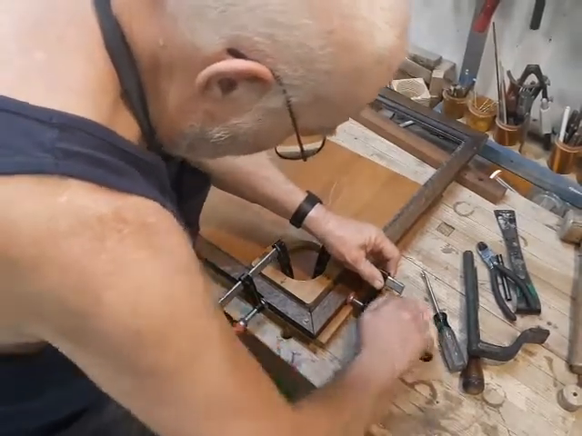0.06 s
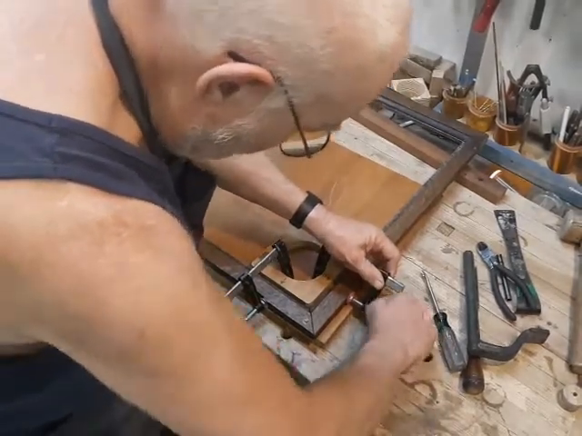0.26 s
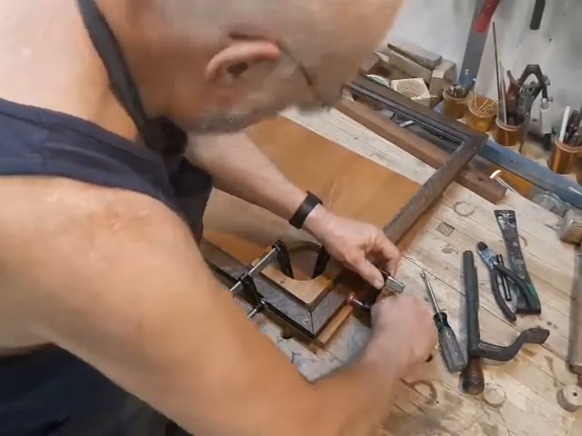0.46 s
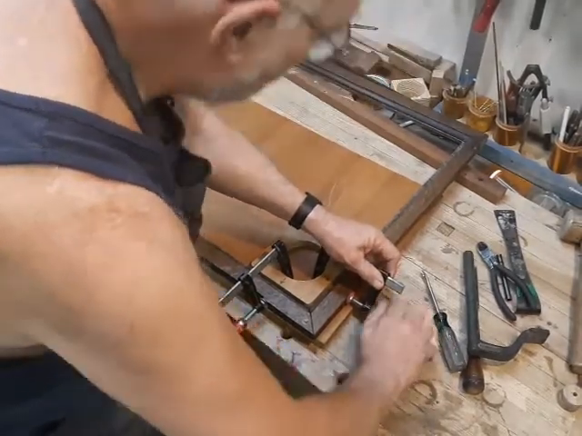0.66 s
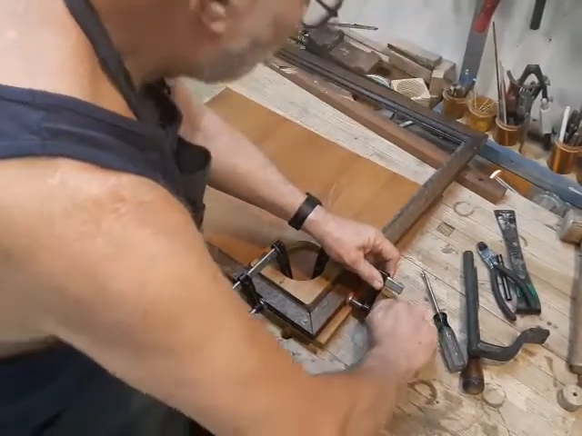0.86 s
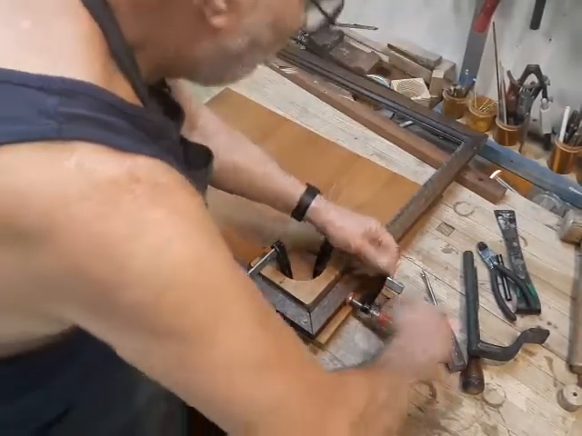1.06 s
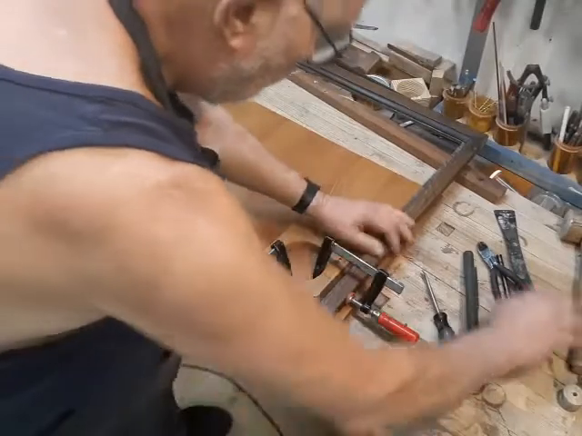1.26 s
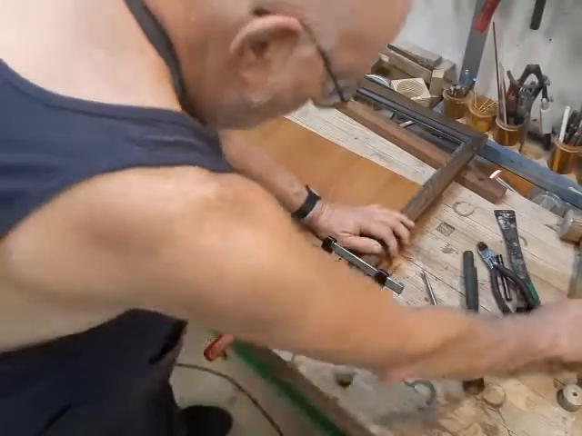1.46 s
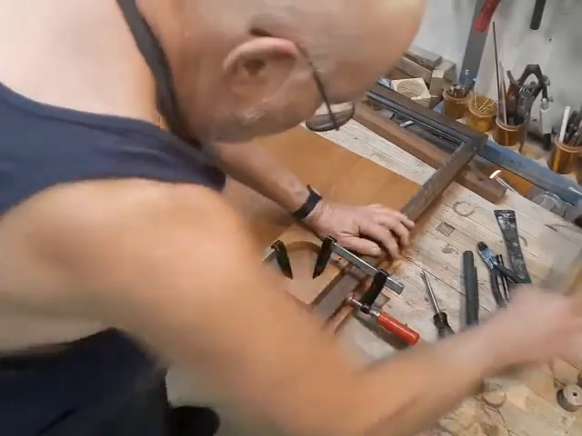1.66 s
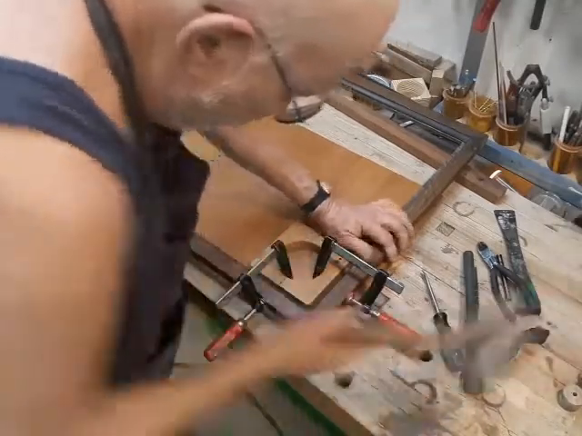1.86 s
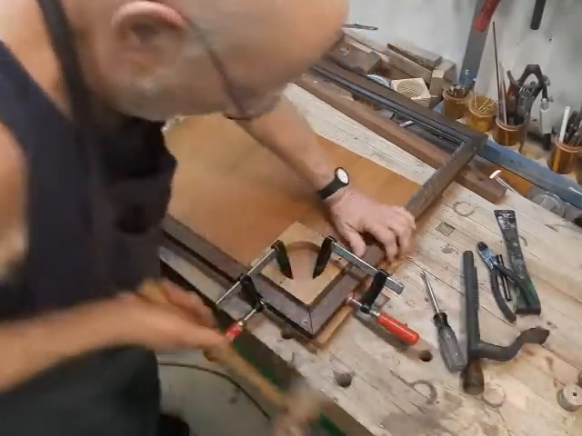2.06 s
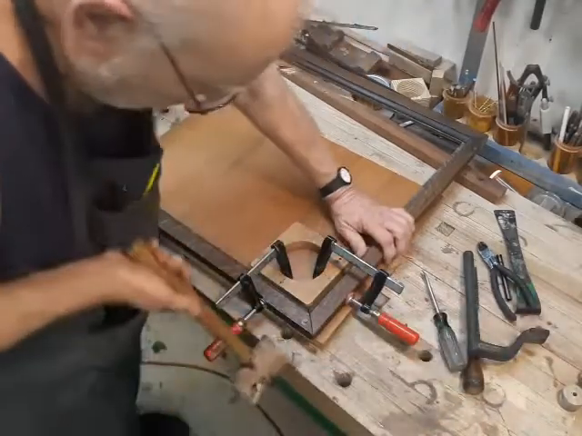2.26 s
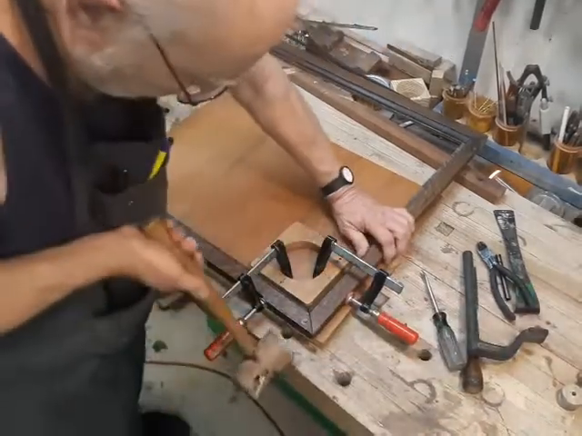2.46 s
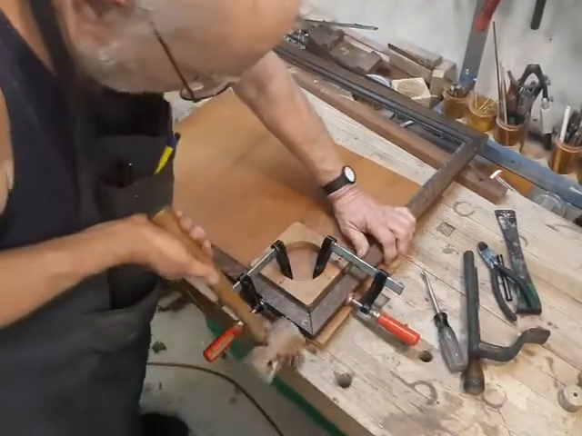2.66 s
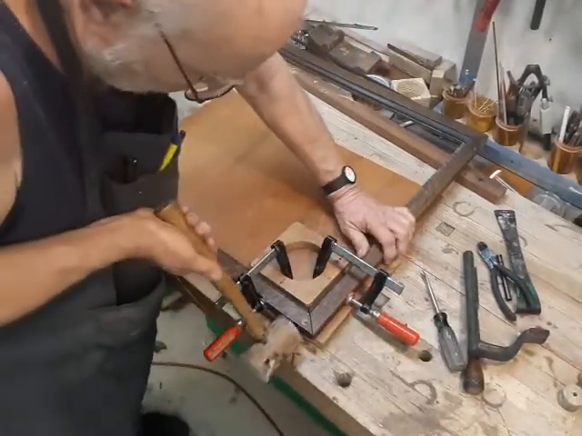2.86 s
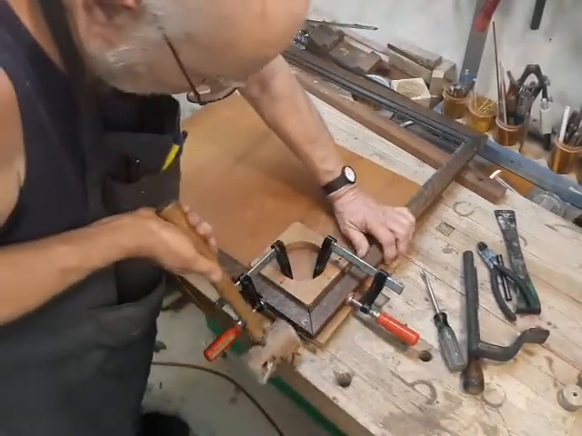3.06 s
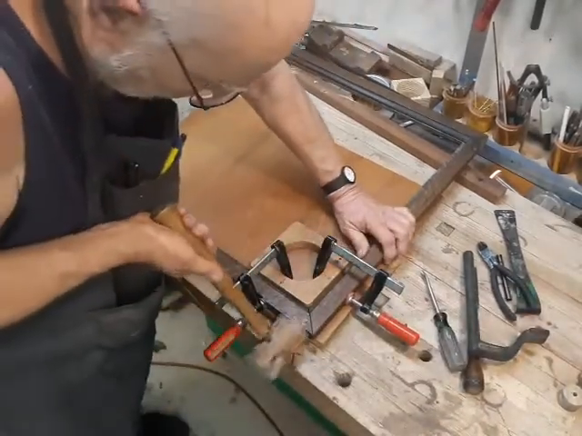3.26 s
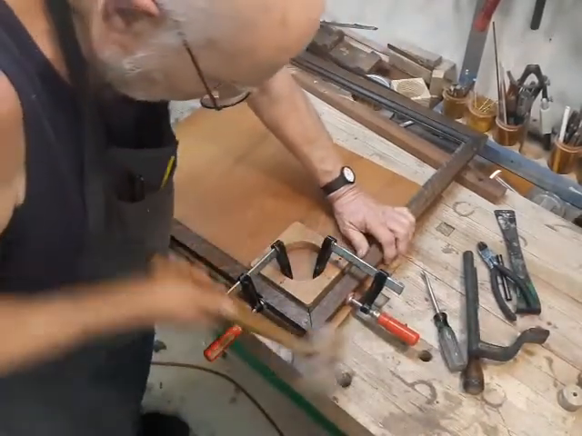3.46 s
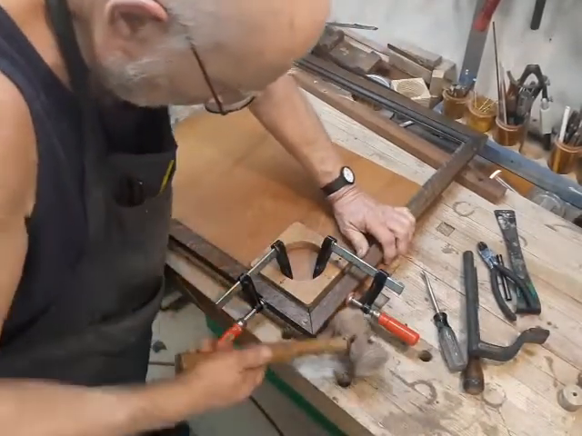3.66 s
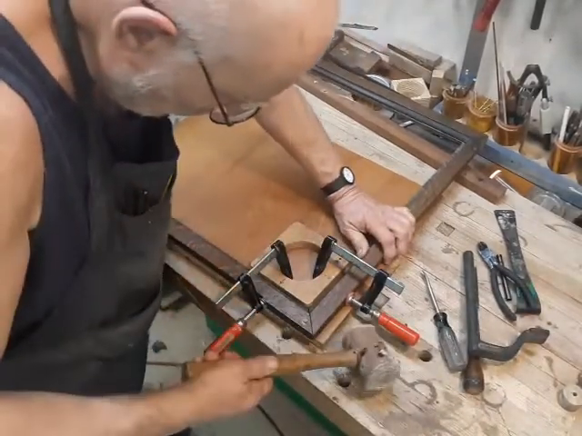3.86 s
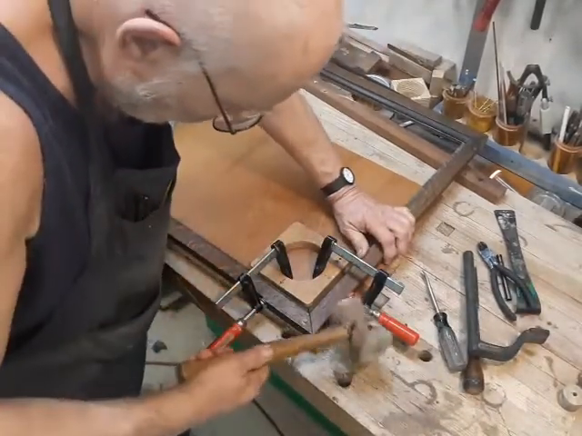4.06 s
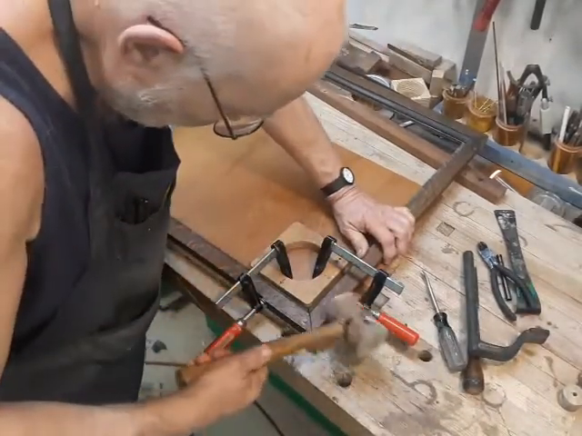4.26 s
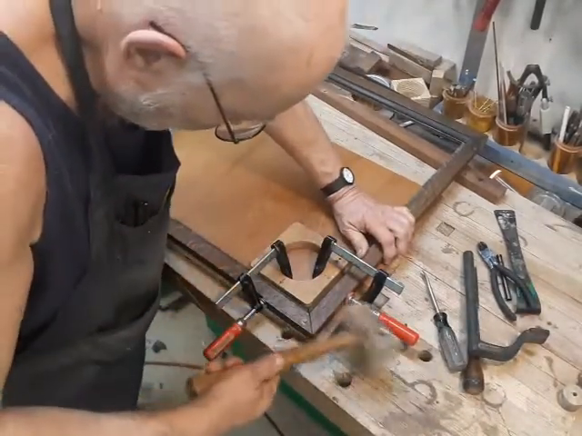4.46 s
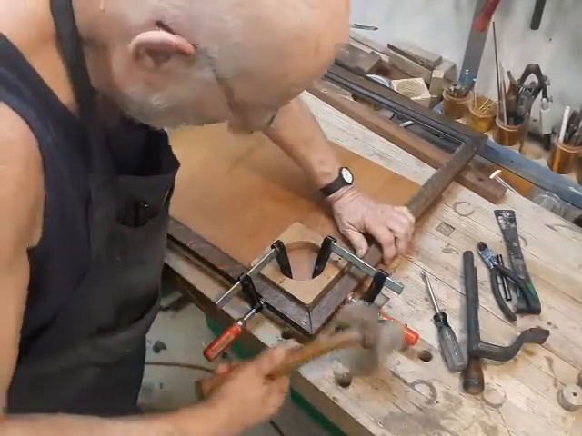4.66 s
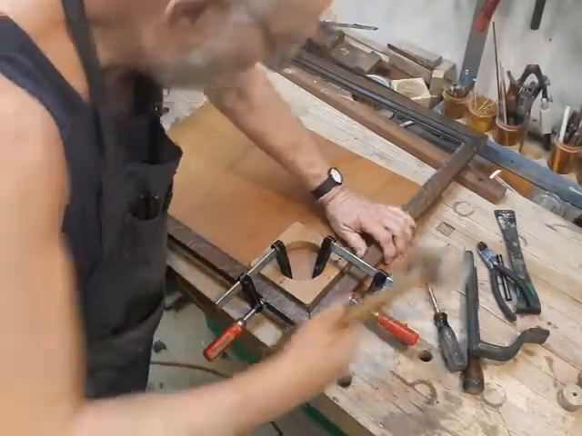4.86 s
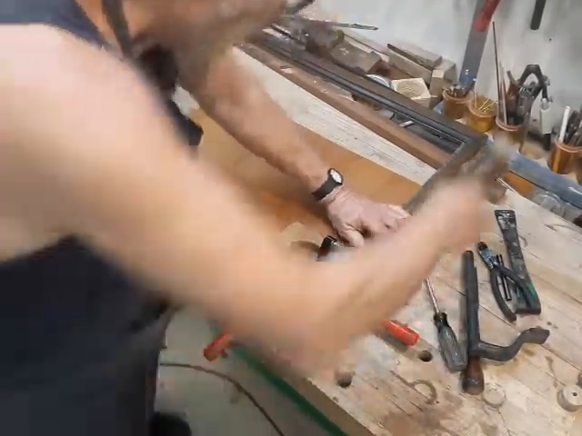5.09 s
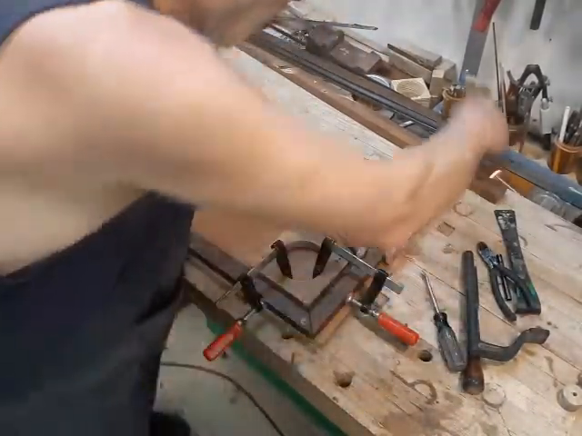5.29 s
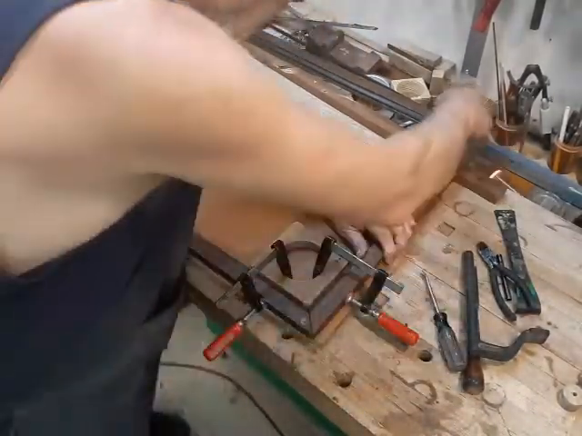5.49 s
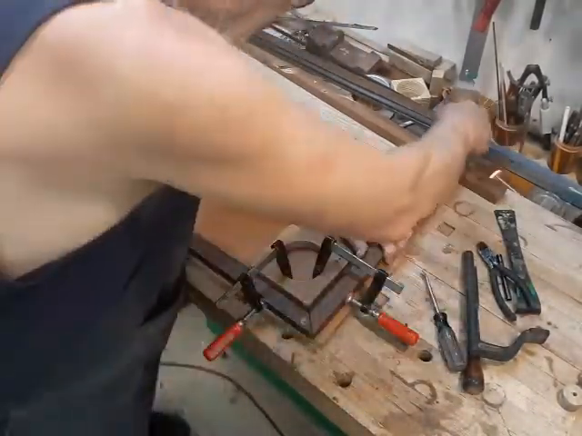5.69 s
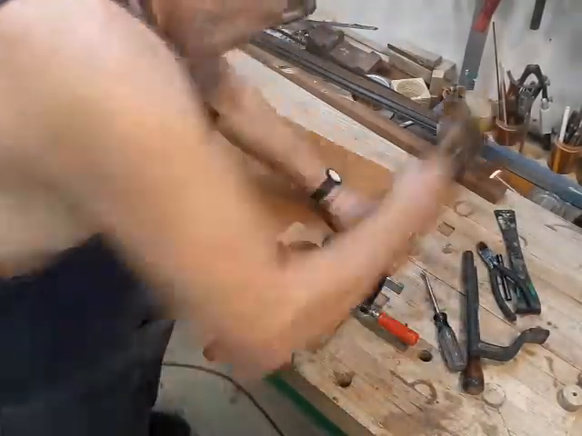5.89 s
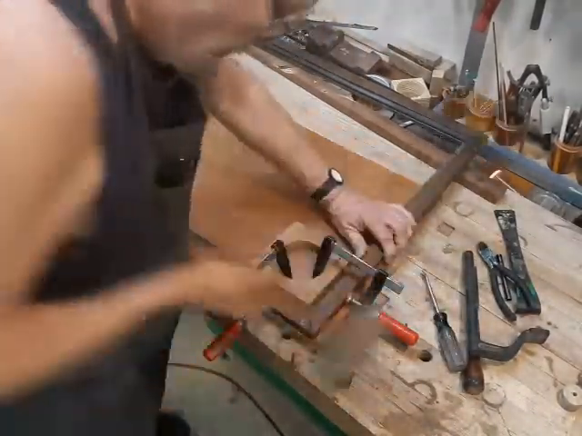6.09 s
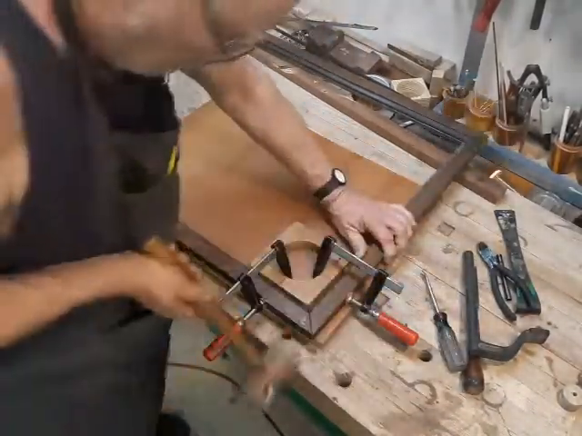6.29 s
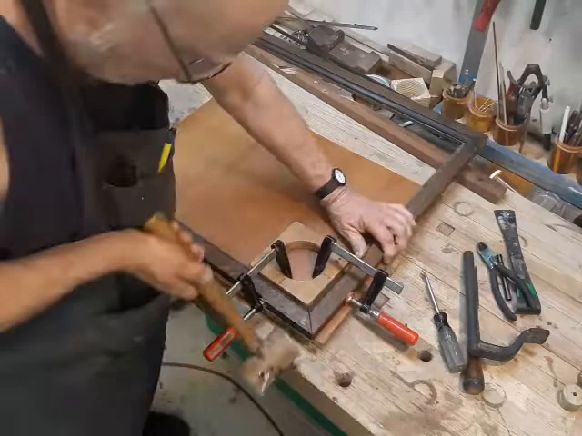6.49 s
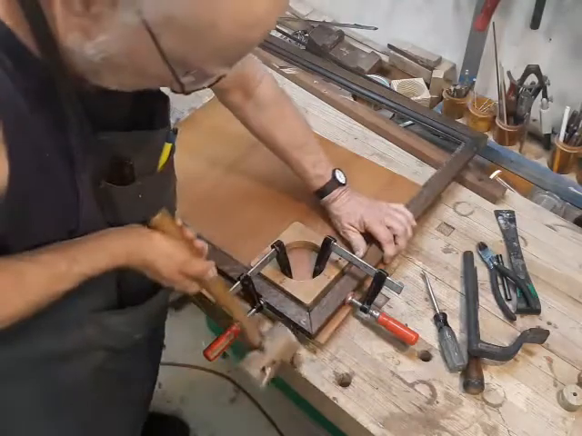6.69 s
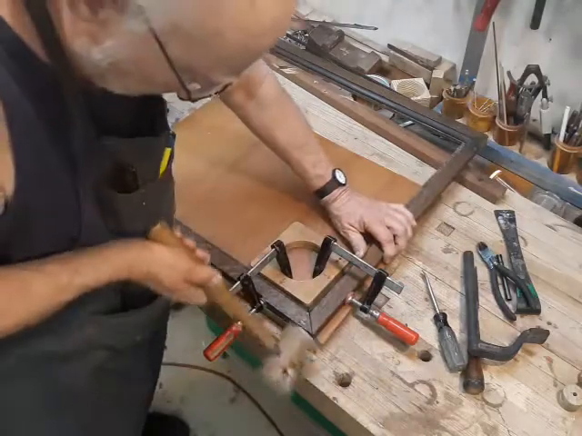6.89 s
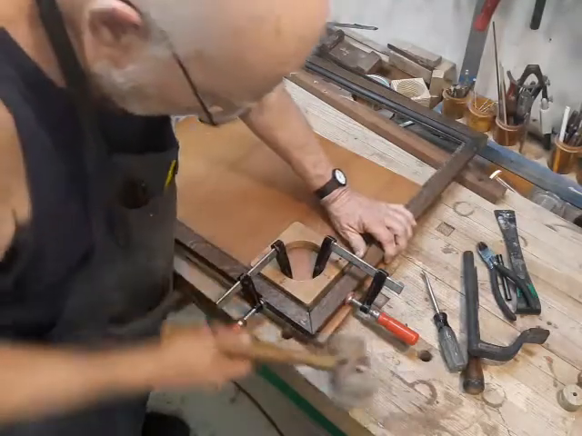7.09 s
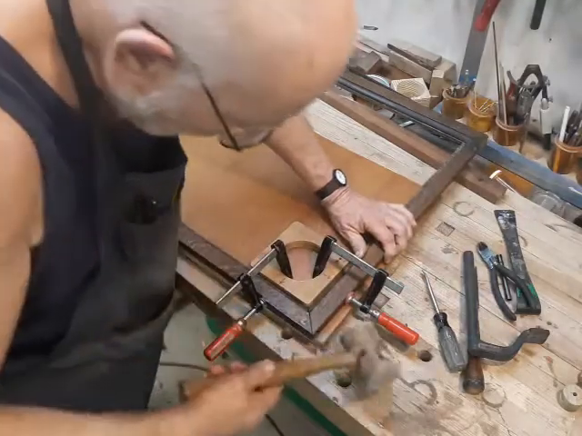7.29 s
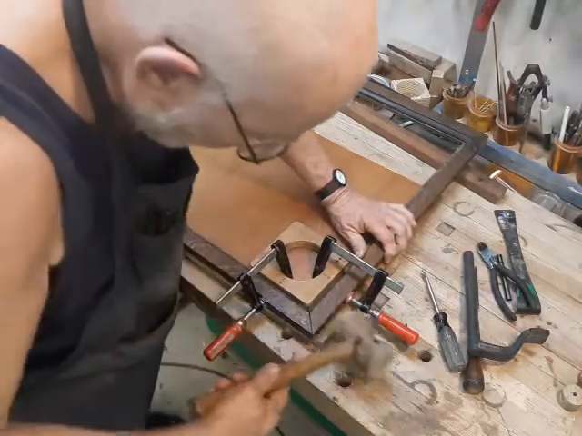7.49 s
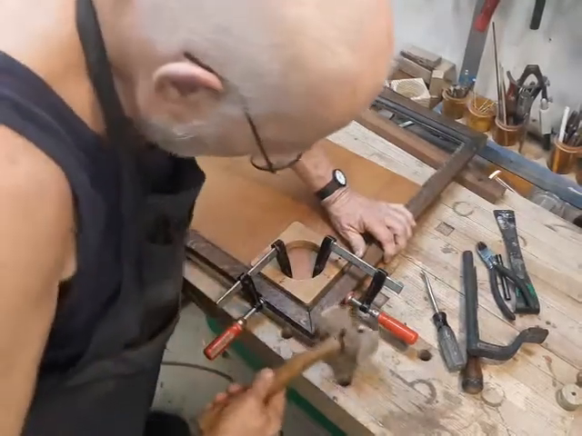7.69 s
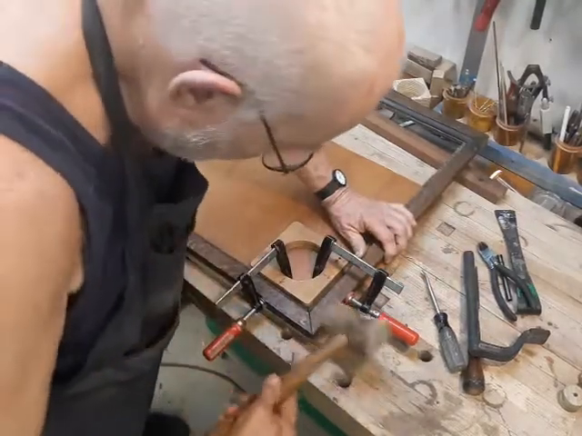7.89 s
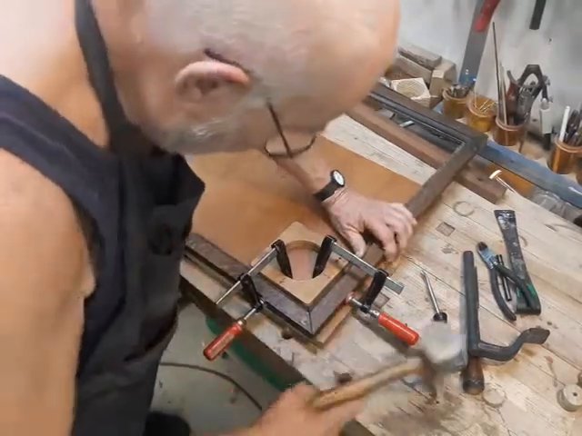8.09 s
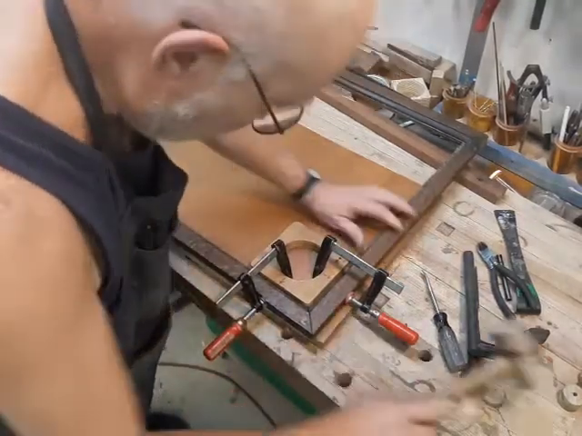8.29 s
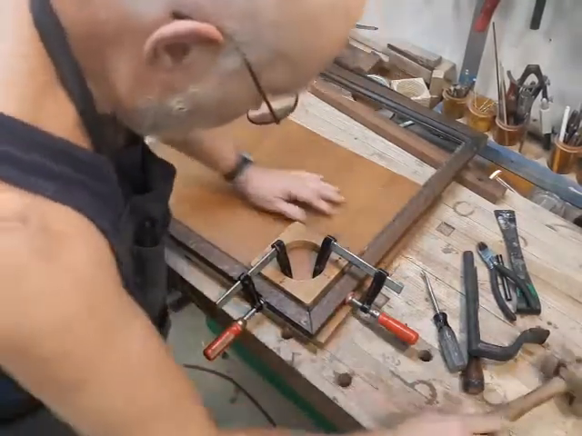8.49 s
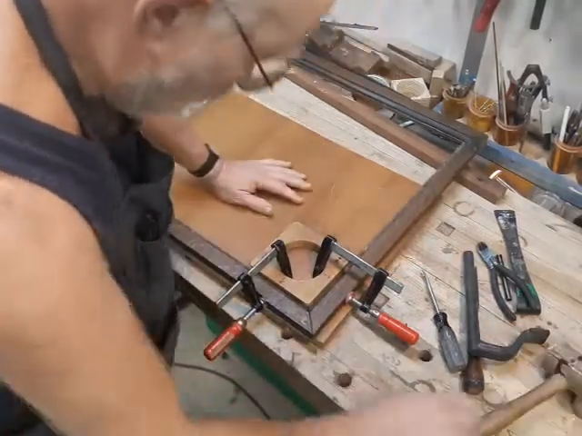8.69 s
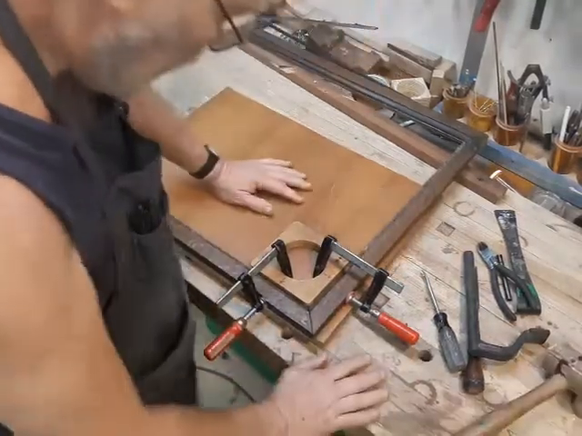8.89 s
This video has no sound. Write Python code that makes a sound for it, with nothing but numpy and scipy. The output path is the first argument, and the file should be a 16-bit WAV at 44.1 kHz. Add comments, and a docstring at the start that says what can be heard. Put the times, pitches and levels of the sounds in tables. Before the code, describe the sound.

A small workshop, captured close in stereo by a phone, near sounds leaning right over low rumble and very faint hiss. From 0.2 to 0.45 s clamp screws give tiny dry steel clicks, with soft rubbing; more clicks and a small knock come near 0.8-0.9 s. Rustling cloth and hand strokes run from 1 to 2.2 s, with a stronger brushing scrape at about 1.8. Hammer taps on the clamped wood begin at 2.8, growing to hard knocks at 3.1 and 3.3, then 4.0, 4.2 and 4.5. A slide follows at 4.8. Softer knocks fall at 5.5 and 5.7, the two loudest cracks at 6.55 and 6.75, then a faint one at 7.4 and firm taps at 7.6 and 7.8. Each has short woody ring, rattle and quick room decay. From 8.2 a loud, bright scraping slide leads to a bumping clatter at 8.4-8.7, then light rubbing.

```python
"""A workshop bench, heard from close by through the two microphone ports of a phone.
Clamp screws click and creak (short steel modes, noise ticks); hands and a hammer slide over the wood (bands of
uneven noise). Then the hammer taps the clamped frame in short series (decaying wood modes, rattle and crack);
the small room answers with fading noise over a low rumble and faint hiss."""
import sys
import numpy as np
from scipy import signal
from scipy.fft import rfft, irfft, next_fast_len
from scipy.io import wavfile
from scipy.ndimage import uniform_filter1d

SR = 44100
rng = np.random.default_rng(int(sys.argv[2]) if len(sys.argv) > 2 else 0)


def transcribe(signal):
    """Save signal, clipped to [-1, 1], as a 16-bit WAV file at the path in sys.argv[1]."""
    frames = np.atleast_2d(signal).T
    limited = np.clip(frames, -1, 1)
    pcm = np.round(limited * 32767).astype(np.int16)
    wavfile.write(sys.argv[1], SR, pcm)


def boost_factor(decibels):
    """Convert a level in decibels to a linear amplitude factor."""
    exponent = np.asarray(decibels, float) / 20
    return 10 ** exponent


N = 394242  # length in samples

# Modes of the frame and bench. Each row: pitch in Hz, level in dB, time to fall 60 dB in seconds.
WOOD_MODES = [(152.3, 1, 0.33), (232.4, -7.5, .15), (297.7, 0, 0.12), (371.6, 3.5, 0.19), (413, -2, 0.16),
              (526, 2, 0.15), (591, -1.5, .2), (652, 2, 0.095), (749.5, 2.5, .12), (872, -3, 0.067),
              (1049, 2, .09), (1186, -4, .08), (1322, -3, 0.096), (1432, -4.5, 0.058), (1785, -6.5, 0.041),
              (1980, -3.5, 0.065), (2297, 2, 0.028), (2440, -5, 0.017), (2983, 3.5, 0.023),
              (3170, 1.5, 0.0057), (6340, 0.5, 0.07)]


def taps(stock):
    """Each blow: a crack, the wood rings, loose clamps and tools rattle for some ms, the room answers."""
    # Each row: start in seconds, level in dB, then bench share, knock share and brightness in dB.
    blows = [(0.9099, -46.5, -24, -1, -6), (0.915, -31, -33.5, -13, -10.5), (2.2677, -58, 10.5, -6, -6),
             (2.814, -23.5, -20.5, 0, -6.5), (2.9762, -27, -16, 6, -8.5), (3.1156, -12, -27.5, -3.5, -12),
             (3.2679, -9.5, -30, -6, -11.5), (3.979, -26.5, -11, -8, -2.5),
             (4.2382, -16.5, -16.5, -13, -4.5), (4.502, -13, -18.5, -9, -0.1),
             (5.5104, -27.5, -19, 1.5, -2), (5.5174, -28.5, -18.5, -5.5, 4.5),
             (5.723, -37.5, -7.5, -2.5, 1.5), (6.558, -7, -34, -14.5, -2), (6.7543, -6.5, -36.5, -11.5, -9),
             (7.3864, -36, -5, -5, -5.5), (7.6005, -15.5, -21.5, -11.5, -3),
             (7.7888, -22.5, -21.5, -9, -13), (8.0317, -61.5, -10, -6, 2), (8.4379, -21, -27, -25.5, -5),
             (8.4434, -22, -29, -24, -5), (8.4594, -30.5, -11, -4.5, -7), (8.5008, -36.5, -5, 7, 1),
             (8.547, -40, 2.5, 6, -15), (8.5866, -25.5, -12, 2.5, 6.5), (8.6371, -33, -13, -7.5, -2),
             (8.7003, -60, -11.5, -5, 12.5)]
    near, far = np.zeros((2, 2, N))
    t = np.arange(SR // 4) / SR
    push = np.minimum(t / 0.0011, 1)  # onset in 1.1 ms
    # the wood is louder while the hammer's wave first runs through it
    first_wave = 1 + boost_factor(4) * np.exp(-t / 0.0061)
    room_db, drier_per_db = -1.5, 0.111  # room share of a full-scale blow; harder blows sound drier
    for s, db, bench_db, knock_db, treble_db in blows:
        thud_db = 0.73 * bench_db + 3.5  # the frame thuds along with the bench
        spot = [(150, bench_db), (330, thud_db), (700, knock_db), (1700, 0),
                (5000, treble_db), (11000, treble_db - 3.5)]
        wood = boost_factor(db - 13.5) * ring(WOOD_MODES, spot, scatter_db=2.5)

        shake, grit = (ports(size=len(t)) * push for _ in range(2))
        fade = fall(t, 0.065)
        rattle = peak(band(shake * fade, 880, 3100), db - 6)
        rattle += peak(band(grit * fade, 1900, 9700), db + treble_db - 3.5)
        crack = peak(band(shake * fall(t, 0.008), 2500, 11000), db + treble_db - 2.5)
        crack += peak(band(grit * fall(t, 0.024), 8400, 16500), db + treble_db - 4.5)
        add(near, s, push * first_wave * wood + rattle + crack)

        # narrow bass octaves need more level per hertz
        source = [(hz, share_db - 3.05 * np.log2(hz / 1700)) for hz, share_db in spot]
        add(far, s, boost_factor(db + room_db - drier_per_db * db) * echoes(source, stock))
    return near, through_wood(far, lift_db=-4.5, width_hz=18)


def ring(modes, source, scatter_db):
    """One blow's ringing at both ports; the spot struck, a (Hz, dB) spectrum, decides which modes wake."""
    hz, db, t60 = np.transpose(modes)
    t = np.arange(SR // 4) / SR
    detune, luck = rng.standard_normal((2, len(modes)))
    sign = (-1) ** np.arange(len(modes))  # neighbours start opposite
    size = boost_factor(db + on_log(source, hz) + scatter_db * luck) * sign
    pole = 2j * np.pi * hz * (1 + 0.005 * detune) - np.log(1000) / t60
    port_gap_s = 0.00008  # arrival time between the ports
    turn = np.exp(2j * np.pi * np.outer([0, port_gap_s], hz))
    return np.imag((size * turn) @ np.exp(np.outer(pole, t)))


def rubs():
    """Strokes of skin, cloth and tool: dense uneven grit; pressure moves the level, the surface the colour."""
    # Each row: time of full pressure in seconds, rise in seconds, hold in seconds,
    # hiss level in dB, coarseness in dB.
    strokes = [(0.001, .02, 0.036, -71, -18), (0.175, 0.086, 0.1, -69.5, 2), (0.373, .02, 0.051, -65.5, 7),
               (0.46, .02, 0.074, -69, -6), (0.598, .05, .02, -73, -10), (0.705, 0.082, .02, -63.5, -2.5),
               (0.767, 0.066, 0.11, -83, 10), (1.044, 0.26, 0.041, -63.5, -7.5),
               (1.129, 0.038, 0.015, -59, -16), (1.237, .01, .012, -64, -15),
               (1.274, 0.038, 0.024, -65.5, -6), (1.371, .05, .02, -64.5, -13),
               (1.45, 0.067, 0.038, -61.5, -10), (1.535, .04, 0.042, -65, -12),
               (1.607, 0.035, 0.17, -57.5, 4.5), (1.793, 0.16, 0.062, -45, -9.5),
               (1.943, 0.089, .03, -54.5, -9), (2.017, .02, 0.0086, -58.5, -9),
               (2.098, .03, 0.032, -65, -6.5), (2.166, .02, .02, -58.5, -9),
               (2.204, 0.023, 0.18, -64.5, -2.5), (2.407, .02, .1, -70, -4), (2.536, .03, 0.0083, -65, -5),
               (2.6, 0.016, 0.13, -79.5, -6), (3.575, 0.013, .005, -68, -7), (3.593, .02, 0.036, -79, -1.5),
               (4.798, 0.089, 0.043, -47.5, -19.5), (4.902, 0.022, .07, -68, -8.5),
               (4.997, .02, 0.065, -74, -9), (5.125, 0.091, 0.066, -71, -10), (5.22, .02, 0.11, -79, -1),
               (5.952, .05, 0.038, -76, -14.5), (6.049, 0.058, 0.01, -69.5, -18),
               (6.096, 0.0087, 0.066, -61, -7.5), (6.35, 0.76, .19, -72, -11),
               (8.03, 0.012, 0.013, -64.5, -3), (8.082, .03, .08, -67.5, -11),
               (8.239, 0.085, 0.183, -39.5, -17), (8.454, 0.042, .17, -41, -23),
               (8.85, .05, 0.025, -60, -18), (8.893, 0.067, .06, -56, -16)]
    rise_db, lift_db_per_s = 21.5, 348  # gained during the rise; fall once the hand lifts
    t = np.arange(N) / SR
    edges = (700, 2700), (1350, 1750), (2200, 5100), (4500, 9800), (7500, 20000)  # Hz
    drag, creak, scrape, hiss, top = (
        unit(band(band(ports(size=N), *edge), *edge)) for edge in edges)
    power = np.zeros((4, N))
    for s, rise, hold, db, coarse_db in strokes:
        span = slice(int(max(s - 2 * rise, 0) * SR), int((s + hold + 0.2) * SR))
        u = t[span] - s
        rising_db = rise_db * np.minimum(u, 0) / rise
        lifting_db = lift_db_per_s * np.maximum(u - hold, 0)
        hiss_db = db + rising_db - lifting_db
        # the scrape follows coarseness less than the drag does
        scrape_db = hiss_db + 0.35 * coarse_db + 0.66
        drag_db = hiss_db + coarse_db - 4
        # light contact is relatively brighter at the very top
        top_db = 0.92 * hiss_db + 1.5
        power[:, span] += boost_factor(np.array([hiss_db, scrape_db, drag_db, top_db])) ** 2
    hiss_size, scrape_size, drag_size, top_size = np.sqrt(power)
    grain = boost_factor(0.46 * walk(400) + 1.3 * walk(40))
    low = drag_size * (drag + boost_factor(-4) * creak)
    return grain * (hiss_size * hiss + scrape_size * scrape + low + top_size * top)


def scuffs():
    """Stick-slip on one spot rings a narrow band for a moment; cloth rustle is the highest."""
    # Each row: middle in seconds, length at half height in seconds, pitch in Hz, width in Hz, level in dB.
    slips = [(0.5, .05, 13000, 5000, -66), (0.673, 0.066, 3960, 350, -70), (1.09, 0.094, 13400, 4470, -50),
             (1.2405, .004, 5840, 1310, -48), (1.468, 0.08, 3120, 500, -61.5),
             (1.469, .05, 12600, 5500, -55), (1.57, 0.037, 13000, 5000, -55),
             (1.737, 0.097, 2610, 604, -46.5), (2.201, .25, 1350, 200, -70), (4.824, 0.07, 1450, 350, -62),
             (5.133, .08, 3197, 400, -68.5), (5.3, .04, 1250, 200, -76.5), (5.954, .06, 3020, 400, -75.5),
             (6.13, 0.053, 1610, 600, -69.5), (6.4, 0.29, 4340, 1000, -68.5)]
    out = np.zeros((2, N))
    for s, length, hz, width_hz, db in slips:
        size = int(length * 2 * SR)
        tone = unit(band(ports(size=size), hz - width_hz / 2, hz + width_hz / 2))
        add(out, s - length, boost_factor(db) * np.hanning(size) * tone)
    return out


def clicks():
    """Screw threads of the clamps slip: short steel ring with a bright tick."""
    # Each row: start in seconds, level in dB, treble in dB.
    thread_slips = [(0.18, -62, 4), (0.214, -50, -9), (0.2331, -48, -8), (0.2537, -55.5, -16),
                    (0.3723, -47, -12), (0.3803, -44, -12), (0.412, -45.5, -0.5), (0.417, -47, -12),
                    (0.4368, -51, 0), (0.7756, -44.5, -9.5), (0.887, -45, -5), (1.2532, -62.5, 17.5),
                    (1.301, -65.5, 13), (3.5713, -70.5, 15), (6.0933, -63, 6)]
    # Each row: pitch in Hz, level in dB, time to fall 60 dB in seconds.
    steel_modes = [(1170, -32, 0.022), (1430, 1.5, 0.0074), (1705, -1.5, 0.026), (3560, -3.5, 0.014),
                   (5480, -8, 0.037)]
    near = np.zeros((2, N))
    t = np.arange(SR // 4) / SR
    for s, db, treble_db in thread_slips:
        noise = ports(size=len(t)) * fall(t, 0.026)
        steel = peak(ring(steel_modes, [(1500, 0), (5000, treble_db)], scatter_db=2), db)
        tick = peak(band(noise, 1130, 2150), db - 2.5)
        tick += peak(band(noise, 3300, 17000), db + treble_db + 1)
        add(near, s, steel + tick)
    return near


def echoes(source, stock):
    """Dense echoes of a blow with this (Hz, dB) spectrum: they build in a few ms, die faster in the treble."""
    # Each row: frequency in Hz, time to fall 60 dB in seconds.
    room_t60 = [(100, 0.32), (250, 0.32), (600, 0.27), (1500, 0.23), (4000, 0.23), (8000, 0.22)]
    t = np.arange(SR // 3) / SR
    i = rng.integers(SR)  # a fresh cut of the noise each time
    tail = 0
    for hz, noise in stock:
        tail = tail + boost_factor(on_log(source, hz)) * noise[:, i:i + len(t)] * fall(t, on_log(room_t60, hz))
    return tail * np.clip((t - 0.003) / 0.014, 0, 1)


def octaves():
    """Two seconds of noise in each octave, the stuff echoes are cut from."""
    return [(1.4 * hz, band(ports(size=2 * SR), hz, 2 * hz)) for hz in 30 * 2.0 ** np.arange(9)]


def through_wood(x, lift_db, width_hz):
    """Echoes carry the pitches of the wood that sent them out."""
    fast = next_fast_len(N, True)
    f = np.fft.rfftfreq(fast, 1 / SR)
    peaks = sum(1 / (1 + 1j * (f - hz) / width_hz) for hz, _, _ in WOOD_MODES)
    return irfft(rfft(x, fast) * (1 + boost_factor(lift_db) * peaks), fast)[:, :N]


def room(x, stock):
    """The room's answer to small sounds: one flat-sourced echo tail of unit energy."""
    tail = echoes([(100, 0), (9000, 0)], stock)
    return signal.fftconvolve(x[None], tail / np.sqrt(np.sum(tail ** 2)), axes=-1)[:, :N]


def floor():
    """A low rumble and faint hiss: shaped noise that wavers a little, stronger on the right."""
    # Each row: frequency in Hz, relative density in dB per Hz.
    rumble_hiss = [(12, -56), (20, -21), (38, -18), (65, -14), (74, -5), (95, -1), (145, -15), (215, -24.5),
                   (247, -25.5), (431, -30.5), (482, -37), (6470, -40.5), (7650, -43.5), (11300, -40.5),
                   (15800, -46.5)]
    pair = np.array([colour(c, rumble_hiss) for c in ports(size=N)])
    waver_db = walk(4)
    side_db = np.array([[-1.2], [1.2]])
    return unit(pair) * boost_factor(-65.5 + waver_db + side_db)


def ports(size):
    """Noise at the two ports: nearly the same in the bass, unrelated in the treble."""
    # Each row: frequency in Hz, likeness of the two ports from 0 to 1.
    likeness = [(60, .93), (250, .88), (640, .55), (1500, .2), (3000, 0)]
    fast = next_fast_len(size, True)
    alike = np.clip(on_log(likeness, np.fft.rfftfreq(fast, 1 / SR)), 0, 1)
    share = np.sqrt([(1 + alike) / 2, (1 - alike) / 2])
    mid, side = rfft(rng.standard_normal((2, fast))) * share
    return irfft([mid + side, mid - side], fast)[:, :size]


def placed(pair, pan):
    """The phone's body shades the left port: about half of each tilt on either side."""
    return np.array([colour(pair[0], pan, 0.5), colour(pair[1], pan, -0.48)])


def walk(rate):
    """Random levels held 1 / rate s and slewed twice; spread near 1."""
    k = int(SR / rate)
    steps = np.repeat(rng.standard_normal(N // k + 1), k)
    return 1.5 * uniform_filter1d(uniform_filter1d(steps, k), k)[:N]


def fall(t, t60):
    """Exponential decay by 60 dB in t60 seconds."""
    return 1000 ** (-t / t60)


def on_log(table, hz):
    """Table value at these frequencies, straight on a log axis."""
    f, v = np.transpose(table)
    return np.interp(np.log(hz + 1), np.log(f), v)


def colour(x, table, share=1):
    """Causal filter with this share of the (Hz, dB) response, from the folded cepstrum."""
    db = share * on_log(table, np.fft.rfftfreq(4096, 1 / SR))
    cep = irfft(db * np.log(10) / 20)
    cep[1:2048] *= 2
    cep[2049:] = 0
    impulse = irfft(np.exp(rfft(cep)))[:2048]
    return signal.fftconvolve(x, impulse, axes=-1)[:len(x)]


def band(x, lo_hz, hi_hz):
    """Band-pass."""
    return signal.sosfilt(signal.butter(2, [lo_hz, hi_hz], "band", fs=SR, output="sos"), x)


def unit(x):
    """Scale to rms 1."""
    return x / np.sqrt(np.mean(x ** 2))


def peak(x, db):
    """Scale so that the loudest 3 ms have this rms level."""
    return x * boost_factor(db) / np.sqrt(np.max(uniform_filter1d(x ** 2, size=132)))


def add(track, s, sound):
    """Mix a sound in at time s."""
    i = int(s * SR)
    k = min(sound.shape[-1], N - i)
    track[..., i:i + k] += sound[..., :k]


def scene():
    """Near sounds sit to the right, the room is wider."""
    # Each row: frequency in Hz, tilt of left against right in dB.
    near_pan = [(100, -6), (400, -2), (800, -2), (1500, -17.5), (3000, -13.5), (7000, -10), (15000, -6)]
    room_pan = [(100, 0), (400, -2), (1500, -8.5), (7000, -2.5), (15000, 0)]
    # Each row: frequency in Hz, gain in dB; the colour of the room, then of the microphone.
    room_tone = [(100, 0.5), (400, 1), (1500, -1.5), (4500, 1), (5500, -1.5), (6400, -3.5), (7500, 2),
                 (14000, 4.5)]
    mic = [(40, -15.5), (100, 4), (200, 7), (700, 0), (2000, -4.5), (4500, -1), (5500, 0.5), (6400, 6.5),
           (7000, -1.5), (7600, -16), (12000, -12.5), (15500, -16.5)]
    stock = octaves()
    near, far = taps(stock)
    small = clicks()
    slide = rubs() + scuffs()
    wet = far + room(boost_factor(-1.5) * small[1] + boost_factor(-7.5) * slide[1], stock)
    wet = np.array([colour(c, room_tone) for c in wet])
    heard = placed(near + small + slide, near_pan) + placed(wet, room_pan)
    # the port cavity peaks near 6.4 kHz and falls away above
    return np.array([colour(c, mic) for c in heard]) + floor()


def low_pass(x):
    """Removes everything above the highest recorded frequency."""
    return signal.sosfilt(signal.butter(12, 16990, fs=SR, output="sos"), x)


def record(dry):
    """The loudest peaks are rounded and the top is cut above 16.2 kHz."""
    rounded = np.tanh(dry)
    top_cut = signal.ellip(8, 0.2, 70, 16200, fs=SR, output="sos")
    return low_pass(signal.sosfilt(top_cut, rounded))


dry = scene()
out = record(dry)
transcribe(out)
```